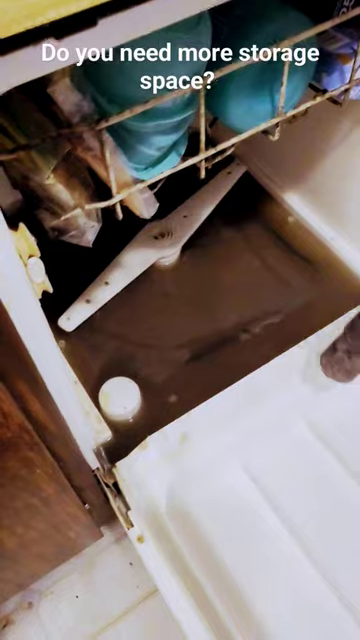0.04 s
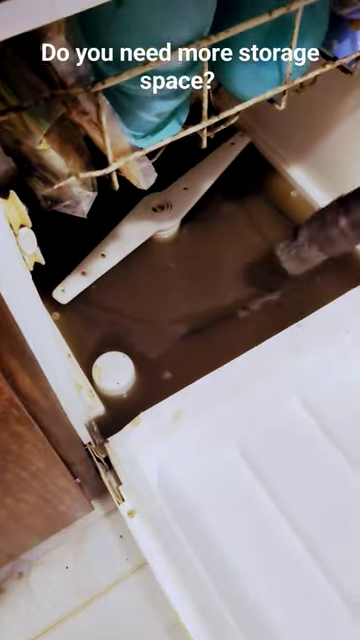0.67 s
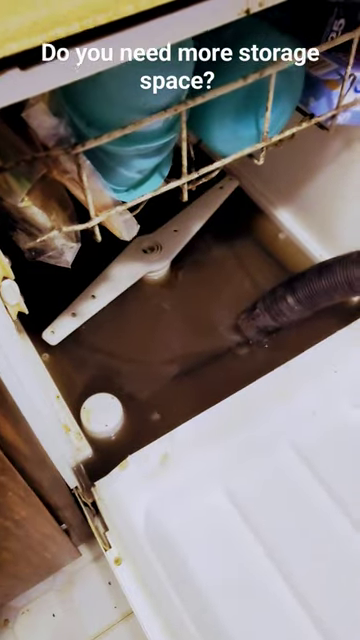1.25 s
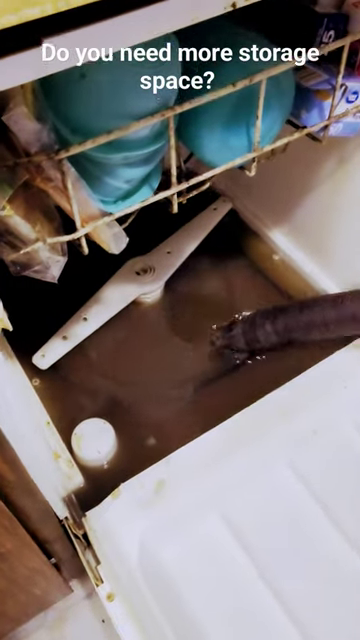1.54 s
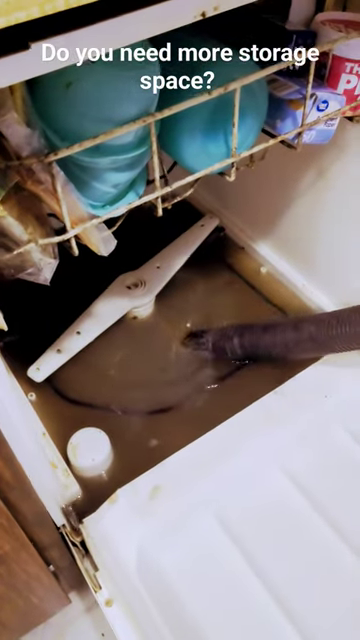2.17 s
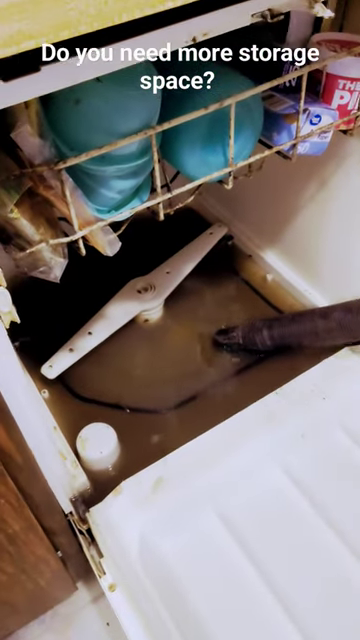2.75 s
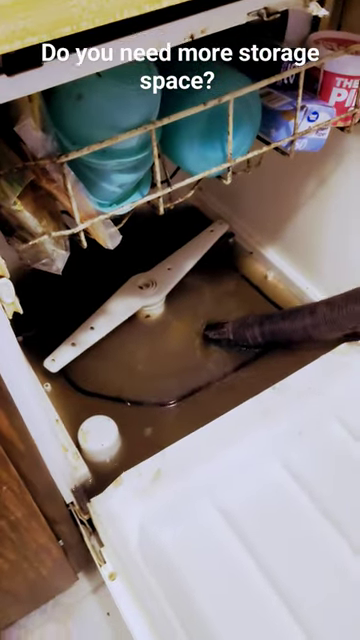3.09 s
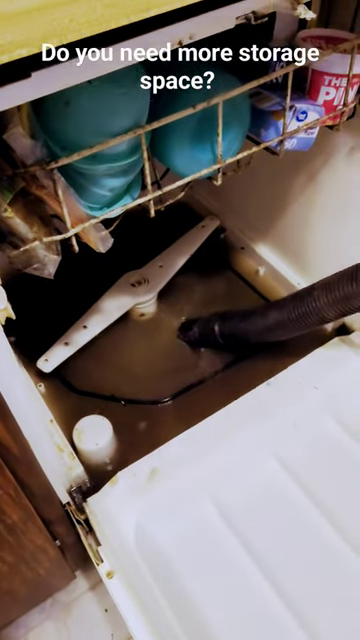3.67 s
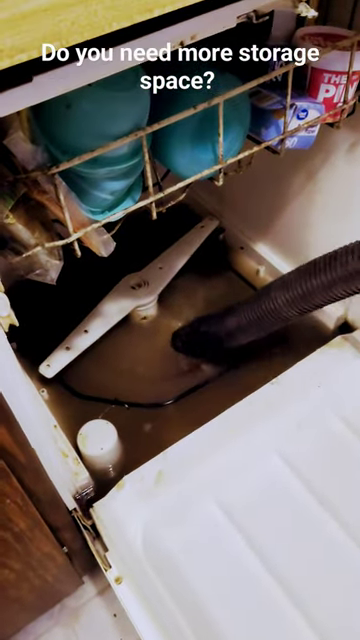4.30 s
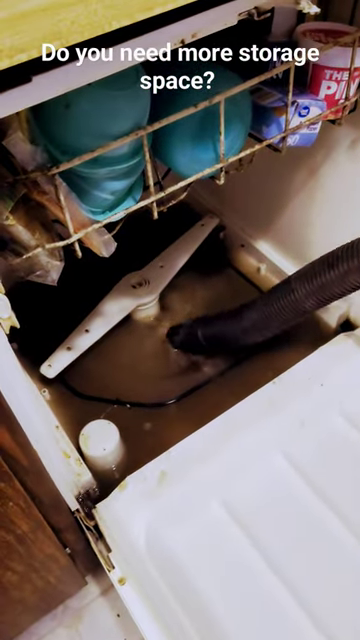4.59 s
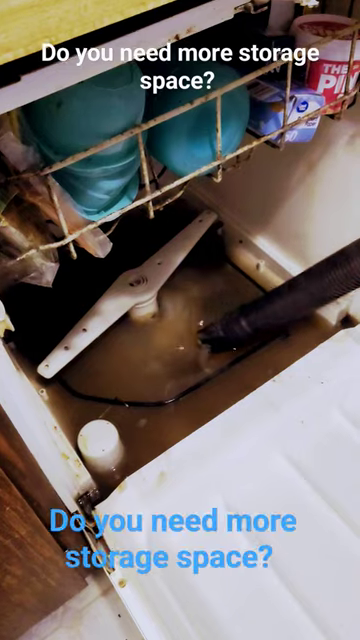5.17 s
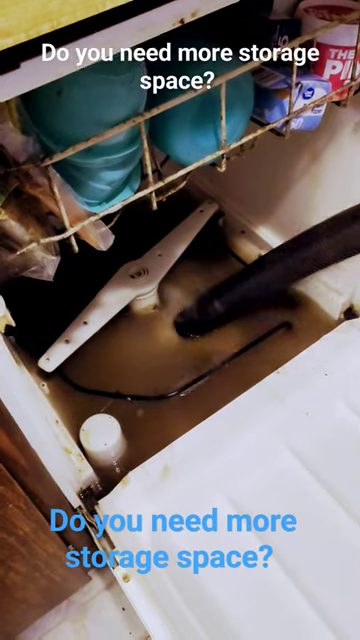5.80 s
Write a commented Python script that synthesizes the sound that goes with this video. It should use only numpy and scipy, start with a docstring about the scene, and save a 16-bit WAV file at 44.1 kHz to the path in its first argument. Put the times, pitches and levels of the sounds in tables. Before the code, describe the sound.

A loud vacuum motor drones, whines and hisses, its hollow roar easing and its hum growing as the hose draws water.

```python
"""In a kitchen, a wet vacuum's hose is dipped into dirty water in the bottom of a dishwasher.
The open hose roars with air; once water chokes it the roar drops, and the unloaded motor speeds up
and hums louder. A worn bearing whines over the hiss of the exhaust, and the water gulps and
spatters at the nozzle."""
import sys
import numpy as np
from scipy import signal
from scipy.fft import rfft, irfft
from scipy.io import wavfile
from scipy.ndimage import uniform_filter1d

SR = 44100
rng = np.random.default_rng(int(sys.argv[2]) if len(sys.argv) > 2 else 0)


def log_audio(samples):
    """Write samples as a 16-bit WAV file to the path given in sys.argv[1]."""
    # one column per channel
    frames = np.atleast_2d(samples).T
    # limit to full scale, then quantise
    limited = np.clip(frames, -1, 1)
    pcm = np.round(limited * 32767).astype(np.int16)
    wavfile.write(sys.argv[1], SR, pcm)


N = 266805
TIME = np.arange(N) / SR
START_S = 0.368  # the sound cuts in
SEAL_S = 1.92  # the first slug of water climbs the hose

# Each row: time in seconds, shaft speed in Hz.
SHAFT_SPEED = [(0.5, 330.1), (1.35, 328.2), (1.7, 329.2), (2.1, 345), (2.35, 347.9), (2.85, 349.4),
               (3.45, 353.3), (3.85, 351.7), (4.2, 353.7), (4.85, 354.3), (5.5, 353.5), (5.65, 352.8),
               (5.97, 354)]
def shaft(wobble=0.00068):
    """Turns made by the slightly unsteady rotor, faster once the choked hose unloads it."""
    return np.cumsum(follow(SHAFT_SPEED)[0] * (1 + wobble * drift(10)[0])) / SR

# Each row: time in seconds, level in dB.
HUM_LEVEL = [(0.4, -18), (0.7, -18), (0.81, -20.5), (0.92, -16), (1.2, -17), (1.28, -18.5), (1.5, -18.5),
             (1.75, -12.5), (2, -10), (2.25, -12.5), (2.45, -12), (2.57, -13.6), (3.45, -14.5),
             (4.4, -13.4), (5.1, -14), (5.3, -12.4), (5.8, -13.6), (6, -12)]
# Hum in the room's standing waves. Each row: time in seconds, left minus right in dB, left lead in rad.
HUM_STEREO = [(0.45, 6.4, -0.45), (0.66, 1.8, -0.43), (0.79, 6.4, -0.52), (1.1, 1.8, -0.41),
              (1.36, 8.3, -0.51), (1.55, 5.1, -0.64), (1.85, 0.6, -0.29), (2.15, 2.3, -0.32),
              (2.35, 0.0, -0.49), (2.64, 2.6, -0.7), (3.46, -1.1, -0.76), (4.9, 0.3, -0.46),
              (5.1, -2.2, -0.52), (5.9, 0.1, -0.57)]
# Second harmonic, wandering as the listener moves.
# Each row: time in seconds, level in dB, left minus right in dB, left lead in rad.
SECOND_HARMONIC = [(.6, -30.5, 16, 1.3), (1.4, -32.5, 12, 3.5), (1.8, -30, 15, 1.3), (2.1, -25, 15, 2.5),
                   (2.6, -26, 6, 0), (3, -24, 3.5, 0.5), (3.9, -29, 3, 1.2), (4.9, -27, -1, 1.35),
                   (5.8, -29, 5, 1.3)]
def motor(turns, resonance_hz=1042.4, width_hz=14):
    """The unbalanced rotor hums once a turn; its third harmonic swells as it passes a resonance."""
    first = clean_tone(turns, *follow(HUM_STEREO)) * gain_of(follow(HUM_LEVEL)[0] + 0.35 * drift(14))
    second_db, side_db, lead_rad = follow(SECOND_HARMONIC)
    second = clean_tone(2 * turns, side_db, lead_rad) * gain_of(second_db + 1.07 * drift(6.1))
    resonance = 1 / (1 + ((3 * follow(SHAFT_SPEED)[0] - resonance_hz) / width_hz) ** 2)
    third = scattered_tone(3 * turns, scatter=0.3, flutter_hz=7) * gain_of(-39.5 + 10.5 * resonance)
    return first + second + third

# Each row: multiple of shaft speed, level in dB with the hose open, level in dB choked.
LOW_MOTOR_TONES = [(2.37, -33, -41), (3.39, -33.5, -36.5), (4, -31.5, -41), (4.39, -49, -33.5),
                   (5, -24.5, -36.5), (5.23, -31.5, -37.5), (5.4, -28.5, -40.5), (6.001, -34, -41.5)]
def low_motor_tones(turns, choke):
    """Shaft harmonics and the bearing's lower tones waver as they follow the shaft."""
    tones = np.zeros((2, N))
    for multiple, open_db, choked_db in LOW_MOTOR_TONES:
        gain = gain_of(between(choke, open_db, choked_db))
        tones += gain * scattered_tone(multiple * turns, scatter=0.84, flutter_hz=9.6)
    fade_in = np.clip((TIME - START_S) / 0.08, 0, 1)
    return tones * fade_in * panned(side_db=-3)[:, None]

# Each row: peak time in seconds, length in seconds, gain in dB.
AIR_SURGES = [(0.51, .12, 1.5), (0.6, 0.1, 2), (0.84, 0.12, -3), (0.903, 0.18, 2), (1.176, 0.32, 2),
              (1.32, 0.1, -2.5), (1.4, 0.093, 2.5), (1.47, 0.083, -0.5), (1.568, 0.22, 2),
              (2.27, 0.53, 1.1), (3.2, .4, 0.5), (4.3, 0.66, 0.5), (4.974, 0.051, 0.5), (5.122, 0.28, -1),
              (5.302, 0.27, 1), (5.79, .12, -1.5), (5.973, 0.24, 0.5)]
def airflow(choke, dip_s=0.32, dip_db=-3):
    """Roar and hiss surge and lull together, and dip briefly at about 1.9 s."""
    surge_db = sum(db * arch(peak_s, length_s) for peak_s, length_s, db in AIR_SURGES)
    roar = hose_roar(choke)
    hiss = exhaust(choke, surge_db)
    roar *= gain_of(surge_db + 0.24 * drift(40))
    return (roar + hiss) * gain_of(dip_db * arch(SEAL_S, dip_s))

# Hose open, then choked. Each row: frequency in Hz, relative density in dB.
OPEN_SPECTRUM = [(120, -29), (200, 1), (280, 11), (360, 6.5), (520, 2), (680, 3.5), (790, 6.5), (900, 4.5),
                 (1150, 4), (1320, 4.5), (1560, 6.5), (1730, 7), (1870, 3), (2400, -21)]
CHOKED_SPECTRUM = [(120, -22), (175, -9), (215, 3.5), (270, 3.5), (330, 0.5), (450, 0.5), (560, 0.5),
                   (680, 1), (810, 3), (1000, 1), (1300, 1.5), (1550, 1), (1750, 1), (1950, -6.5),
                   (2500, -13)]
def hose_roar(choke, open_db=-20.5, choked_db=-21, sag_db_per_s=0.38):
    """Air roars and rings in the open hose; choked, the ring goes and the roar slowly sinks."""
    open_roar = turbulence(OPEN_SPECTRUM, patchy_db=1.5, ripple_db=2) + hose_ring()
    choked_roar = turbulence(CHOKED_SPECTRUM, patchy_db=1.1, ripple_db=4.5)
    sag_db = sag_db_per_s * np.maximum(TIME - SEAL_S, 0)
    return (gain_of(open_db) * np.sqrt(1 - choke) * open_roar
            + gain_of(choked_db - sag_db) * np.sqrt(choke) * choked_roar)

# Each row: frequency in Hz, width in Hz, level in dB relative to the roar.
HOSE_MODES = [(779.5, 18, -10.5), (965, 24, -11.5), (1301, 30, -10.5), (1715, 37, -9.5)]
def hose_ring():
    """Air rushing over the open end excites the hose's standing waves: fuzzy, hollow whistles."""
    hz = np.fft.rfftfreq(N, 1 / SR)
    rush = rfft(rng.standard_normal((2, N))) * panned(at_hz(NOISE_BALANCE, hz))
    return sum(gain_of(db) * unit_rms(irfft(rush / (1 + 1j * (hz - mode_hz) / width_hz) ** 2, N))
               for mode_hz, width_hz, db in HOSE_MODES)

# Each row: frequency in Hz, relative density in dB.
EXHAUST_SPECTRUM = [(500, -23), (1500, -4.5), (2300, 2.5), (2900, 3), (3700, 2), (4500, 0.5), (5200, 0.5),
                    (6100, -1), (6900, -2.5), (8800, -3.5), (10000, -3.5), (12000, -2.5), (15500, -2.5)]
def exhaust(choke, surge_db, surge_share=0.77):
    """Exhaust air hisses throughout and partly follows the surges."""
    level_db = between(choke, open_db=-22, choked_db=-21.5) + surge_share * surge_db
    flicker_db = 0.5 * drift(62) + 0.15 * drift(4)
    return gain_of(level_db + flicker_db) * turbulence(EXHAUST_SPECTRUM, patchy_db=1.5, ripple_db=2)

# Each row: multiple of the main tone, relative level in dB with the hose open, the same choked.
BEARING_TONES = [(.8915, -3, -4), (1.1139, -2, -6), (1.1888, -4, -1), (1.3864, -4, -5.5), (1.4308, -16, -3),
                 (1.486, -3.5, -4.5), (1.783, -12, -5), (1.8864, -3, -1), (1.9997, -10, -6),
                 (2.0803, -15, -10), (2.1139, -1.5, -3), (2.7976, -19, -12), (2.8864, -20, -5),
                 (3, -20, -12), (3.1142, -12, -12), (3.3417, -13, -11), (3.5695, -14, -13),
                 (3.6837, -20, -11), (3.7976, -7, -12.5), (4.2531, -18, -12), (4.3679, -20, -12)]
# Main tone in the room's standing waves.
# Each row: time in seconds, left minus right in dB, left lead in rad.
BEARING_STEREO = [(.55, -16, 2.8), (1.2, -3, 3), (1.65, -4, 4.4), (2.3, 0, 5.6), (2.75, -13, 3.8),
                  (3.3, -4, 1.4), (3.8, 7, 1.49), (4.35, -9, 1.63), (4.8, -8, 2.98), (5.3, -3, 4.34),
                  (5.7, -19, 3.6), (6, -2, 6.1)]
def bearing(turns, choke, cycles_per_turn=8.781, slip=0.00029, flicker_db=2.3):
    """Balls rolling over worn races sing a family of tones between the shaft's harmonics."""
    cycles = cycles_per_turn * np.cumsum(np.gradient(turns) * (1 + slip * drift(6.5)[0]))
    main_db = between(choke, open_db=-39.5, choked_db=-33.5) + flare_db(1)
    main_db = main_db + flicker_db * drift(9.5, channels=2)
    main = gain_of(main_db) * clean_tone(cycles, *follow(BEARING_STEREO))
    others = np.zeros((2, N))
    for multiple, open_db, choked_db in BEARING_TONES:
        gain = gain_of(between(choke, open_db, choked_db) + flare_db(multiple))
        others += gain * scattered_tone(multiple * cycles, scatter=0.43, flutter_hz=6.7)
    others *= gain_of(between(choke, open_db=-37, choked_db=-35.5))
    return main + others * panned(side_db=-2.5)[:, None]

# Each row: peak time in seconds, length in seconds, gain in dB, tone name.
BEARING_FLARES = [(0.53, 0.39, 8.5, "main"), (1.02, .2, 8, "main"), (1.666, 0.19, 12.5, "main"),
                  (2.3, 0.46, 6.5, "main"), (2.74, 0.59, 6.5, "main"), (3.266, 0.59, 4, "main"),
                  (3.9, .35, 6, "main"), (4.26, 0.73, 8.5, "main"), (5.36, 1, 7.5, "main"),
                  (5.9, 0.36, 5.5, "main"), (3.26, 1.06, 6.5, "low"), (5.7, .7, 4.5, "low"),
                  (2.4, 0.75, 5.5, "second"), (5.2, 0.3, 5.5, "second"), (2.297, 0.39, 6.5, "third"),
                  (4.365, 0.78, 6, "third"), (0.9, 0.31, 1.5, "middle"), (2.8, 1, 0, "middle"),
                  (4.7, 1.8, 4, "middle"), (2.4, .45, 5, "high"), (3.16, 0.69, 8, "high"),
                  (4.26, 1.5, 7, "high"), (5.7, 0.37, 5, "high")]
# Each entry: tone name, multiple of the main tone.
FLARE_MULTIPLES = {"low": .8915, "main": 1, "second": 1.1888, "third": 1.486, "middle": 1.8864, "high":
                   2.1139}
def flare_db(multiple):
    """Gain of one bearing tone as it flares up and dies back."""
    return sum(db * arch(peak_s, length_s) for peak_s, length_s, db, name in BEARING_FLARES
               if FLARE_MULTIPLES[name] == multiple)

# Each row: peak time in seconds, level in dB.
GULPS = [(1.35, -29), (1.56, -32.5), (1.72, -37), (3.04, -32), (3.77, -40), (4.78, -39), (5.45, -39),
         (5.88, -42), (6.03, -37)]
# Each row: frequency in Hz, relative density in dB.
RUMBLE_SPECTRUM = [(20, -43), (35, -27), (55, 2), (80, 1.5), (110, 2), (160, 3), (230, -5.5), (400, -25)]
def nozzle_rumble(buffet_from_s=0.48, buffet_to_s=2, ramp_s=0.36, rise_s=0.022, fall_s=0.035):
    """Air buffets the microphone while the hose hangs open; water churns and gulps in the nozzle."""
    hanging = np.clip(np.minimum(TIME - buffet_from_s, buffet_to_s - TIME) / ramp_s, 0, 1)
    buffet = gain_of(-37.5) * hanging
    churn = gain_of(-44 + drift(9.9)[0])
    gulps = [gain_of(db) * np.exp(-np.maximum((peak_s - TIME) / rise_s, (TIME - peak_s) / fall_s))
             for peak_s, db in GULPS]
    envelope = np.linalg.norm([buffet, churn, *gulps], axis=0)  # powers add
    return envelope * turbulence(RUMBLE_SPECTRUM, patchy_db=0)

def spatter(choke, drops_per_s=60, level_db=-42, decay_s=0.0014):
    """Drops tick against the inside of the hose as it draws water."""
    hits = rng.random(N) < drops_per_s / SR
    strength = gain_of(4.4 * np.minimum(rng.exponential(1, N), 3))
    bursts = signal.lfilter([1], [1, -np.exp(-1 / (decay_s * SR))], hits * strength)
    return gain_of(level_db) * choke * unit_rms(bursts * rng.standard_normal((2, N)))

# Each row: frequency in Hz, left-right coherence from 0 to 1.
NOISE_COHERENCE = [(30, 0.96), (250, 1), (400, 0.97), (520, 0.76), (700, 0.26), (920, 1), (1100, 0.24),
                   (1600, 0.67), (2000, 0.43), (2600, 0.25), (4000, 0.41), (15000, 0.026)]
# Each row: frequency in Hz, left lead in rad.
NOISE_LEAD = [(400, -0.2), (520, 1.4), (880, 0.16), (1080, -0.4), (1200, -0.96), (1500, 0.39), (1750, 1.54),
              (2400, 1.79)]
# Each row: frequency in Hz, left minus right in dB.
NOISE_BALANCE = [(100, -1.5), (300, 1), (450, 1), (620, -5.5), (800, 4.5), (1000, -6.5), (1300, -3),
                 (1700, -5), (2200, 1), (3700, -1.5), (6000, 0.5), (6800, -9.5), (7700, 0.5), (14000, 2)]
def turbulence(spectrum, patchy_db, ripple_db=0, size=2048):
    """Stereo noise of rms 1 with passing eddies, rippled by resonances of hose, tub and room."""
    hz = np.fft.rfftfreq(size, 1 / SR)
    frames = 4 * N // size + 5
    left_re, left_im, apart_re, apart_im, eddies = rng.standard_normal((5, frames, len(hz)))
    eddies = uniform_filter1d(eddies, size=4, axis=0)
    eddies = unit_rms(uniform_filter1d(eddies, size=24, axis=1))
    ripple = rng.uniform(-1.53, 1, (2, 1, len(hz)))
    coherence = at_hz(NOISE_COHERENCE, hz)
    left = left_re + 1j * left_im
    right = coherence * left + np.sqrt(1 - coherence ** 2) * (apart_re + 1j * apart_im)
    right *= np.exp(-1j * at_hz(NOISE_LEAD, hz))
    colour = gain_of(at_hz(spectrum, hz) + patchy_db * eddies + ripple_db * ripple)
    spectra = np.array([left, right]) * colour * panned(at_hz(NOISE_BALANCE, hz))[:, None]
    _, noise = signal.istft(spectra.swapaxes(1, 2), nperseg=size, noverlap=size - size // 4)
    return unit_rms(noise[:, :N])

def clean_tone(cycles, side_db, lead_rad):
    """A sine of rms 1 that differs in level and phase between the ears."""
    return np.sqrt(2) * np.sin(2 * np.pi * cycles + lead_rad * np.array([[.5], [-.5]])) * panned(side_db)

def scattered_tone(cycles, scatter, flutter_hz):
    """A tone of rms 1: a steady part, leading on the left, plus reflections that fade in and out."""
    phase_rad = 2 * np.pi * rng.random()
    lead_rad = rng.uniform(np.pi / 2 - 0.5, np.pi / 2 + 0.5)
    steady = np.exp(1j * (phase_rad + np.array([[lead_rad], [0]])))
    along, across = scatter * drift(flutter_hz, channels=4).reshape(2, 2, N) / np.sqrt(2)
    angle = 2 * np.pi * cycles
    return unit_rms((steady.real + along) * np.cos(angle) - (steady.imag + across) * np.sin(angle))

def drift(rate_hz, channels=1):
    """Slow noise of rms 1, up to about the given rate."""
    grid_s = np.linspace(0, N / SR, num=2048)
    hz = np.fft.rfftfreq(len(grid_s), grid_s[1])
    white = rng.standard_normal((channels, len(grid_s)))
    slow = irfft(rfft(white) / (1 + (hz / rate_hz) ** 2))
    return np.array([np.interp(TIME, grid_s, unit_rms(row)) for row in slow])

def gain_of(db):
    """Decibels to amplitude."""
    return 10 ** (db / 20)

def unit_rms(x):
    """Scales to rms 1."""
    return x / np.sqrt(np.mean(x ** 2) + 1e-20)

def follow(rows):
    """The columns of a time table, one value a sample."""
    times_s, *columns = np.transpose(rows)
    return [np.interp(TIME, times_s, column) for column in columns]

def at_hz(rows, hz):
    """A spectrum table interpolated on a log-frequency axis."""
    row_hz, values = np.transpose(rows)
    return np.interp(np.log(hz + 1), np.log(row_hz + 1), values)

def panned(side_db):
    """Left and right gains of mean power 1."""
    pair = gain_of(np.array([side_db, -side_db]) / 2)
    return pair / np.sqrt(np.mean(pair ** 2, axis=0))

def arch(peak_s, length_s):
    """A half-cosine rise and fall, 0 to 1."""
    return np.cos(np.pi * np.clip((TIME - peak_s) / length_s, -0.5, 0.5))

def between(choke, open_db, choked_db):
    """A level that goes from its open to its choked value."""
    return open_db + (choked_db - open_db) * choke

# Each row: time in seconds, share of the hose choked by water from 0 to 1.
HOSE_CHOKE = [(0.37, 0.07), (1.6, 0.01), (1.68, 0.7), (2, 0.99), (6.05, 0.94)]
def scene():
    """The vacuum's parts, driven by the shaft and the choking of the hose."""
    turns = shaft()
    choke = follow(HOSE_CHOKE)[0]
    machine = motor(turns) + low_motor_tones(turns, choke) + bearing(turns, choke)
    return machine + airflow(choke) + nozzle_rumble() + spatter(choke)

def record(dry, notch_hz=7950, notch_width_hz=450, rise_s=0.081, ceiling=0.9, cutoff_hz=15520):
    """A dip in the microphone's treble, an abrupt start, softly rounded peaks and a band limit."""
    hz = np.fft.rfftfreq(N, 1 / SR)
    notch = gain_of(-6 * np.exp(-((hz - notch_hz) / notch_width_hz) ** 2))
    since_s = np.maximum(TIME - START_S, 0)
    fade_in = np.minimum(since_s / 0.0041, 1) * gain_of(-15 * np.exp(-since_s / rise_s))
    heard = irfft(rfft(dry) * notch, N) * fade_in
    rounded = heard / (1 + (heard / ceiling) ** 8) ** (1 / 8)
    lowpass = signal.firwin(1501, cutoff_hz, window=("kaiser", 10), fs=SR)
    return signal.oaconvolve(rounded, lowpass[None], "same")

dry = scene()
out = record(dry)
log_audio(out)
```